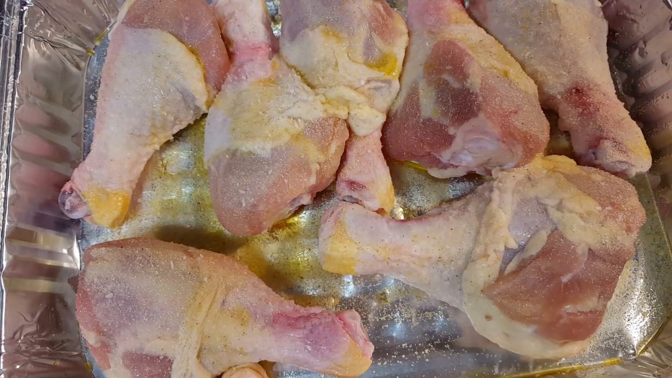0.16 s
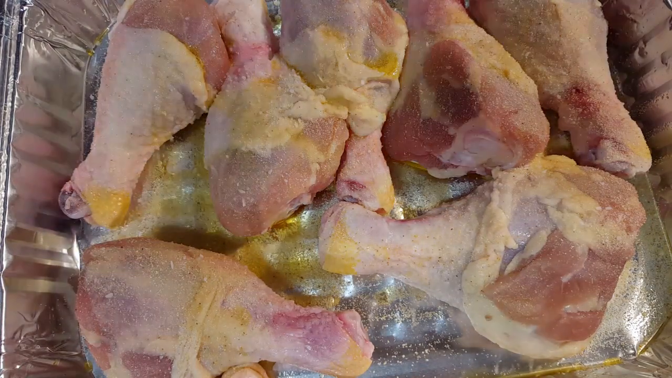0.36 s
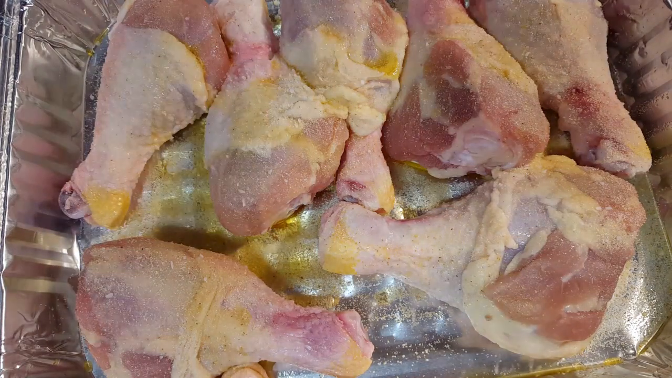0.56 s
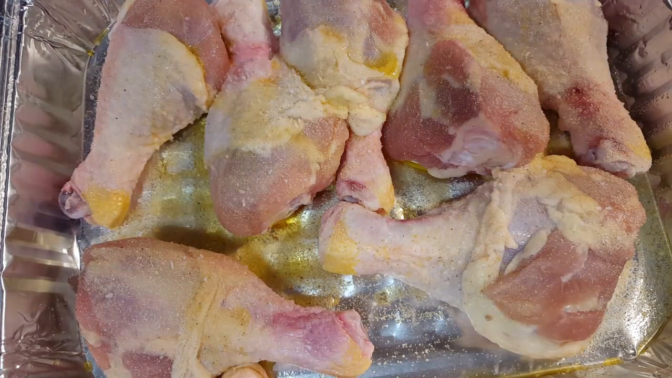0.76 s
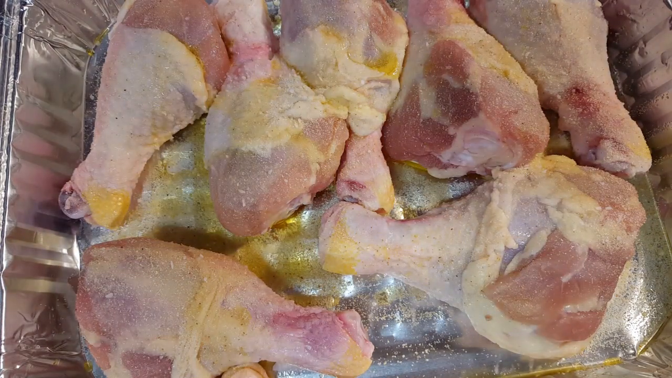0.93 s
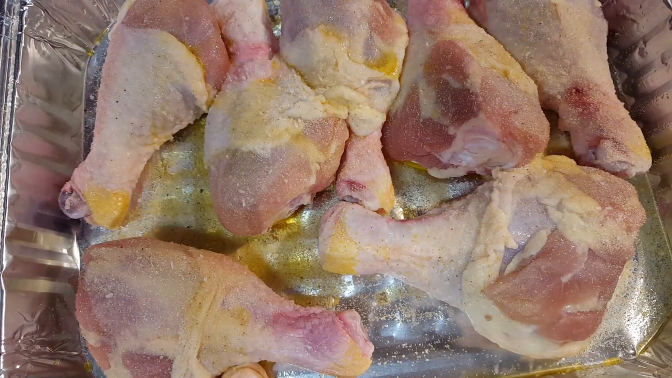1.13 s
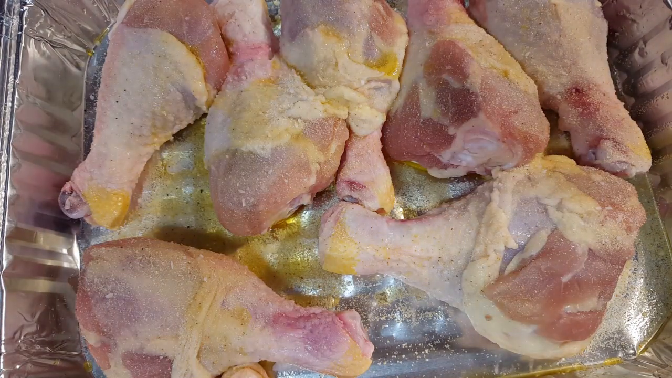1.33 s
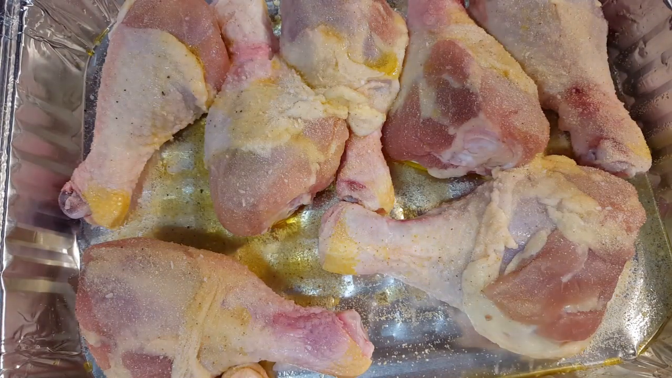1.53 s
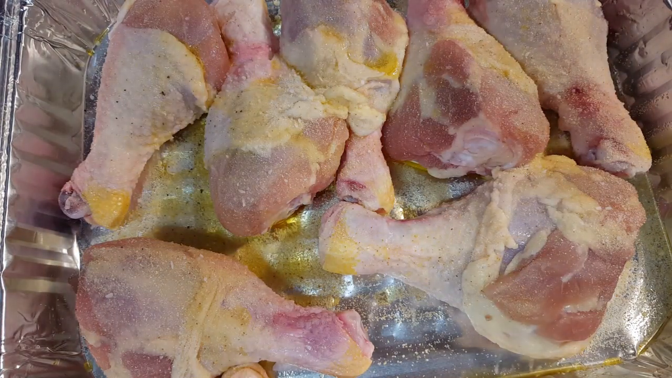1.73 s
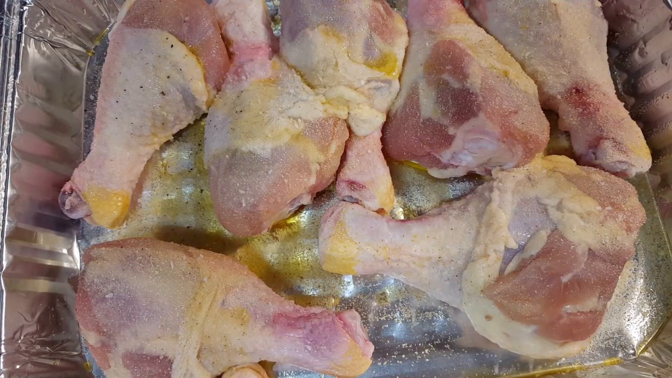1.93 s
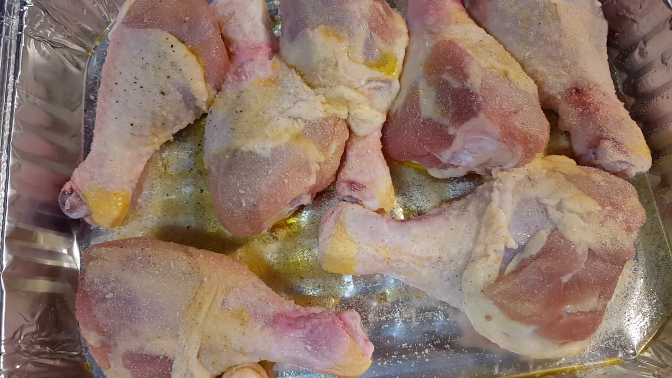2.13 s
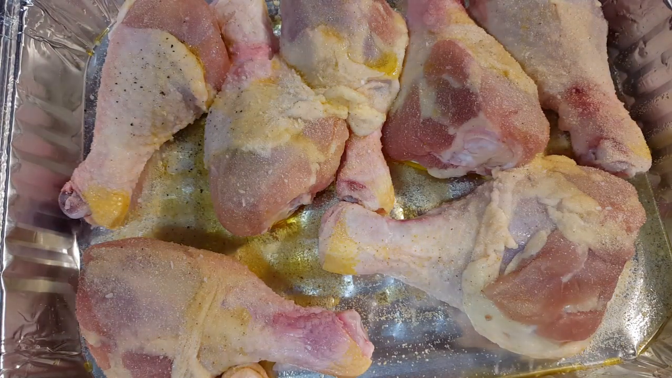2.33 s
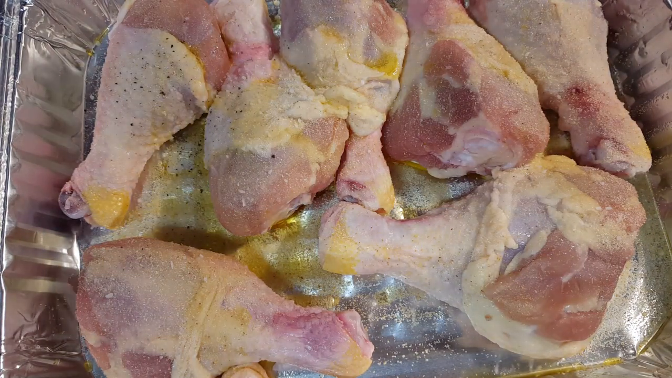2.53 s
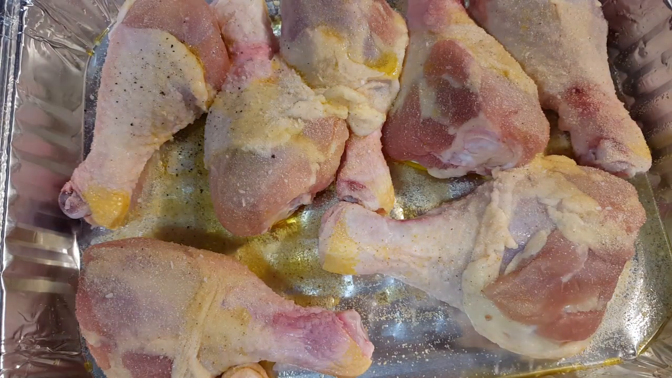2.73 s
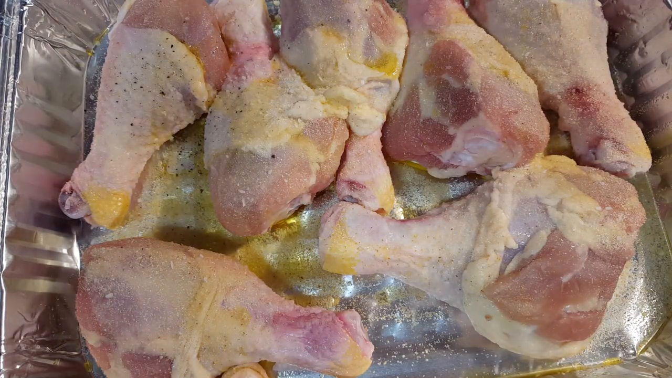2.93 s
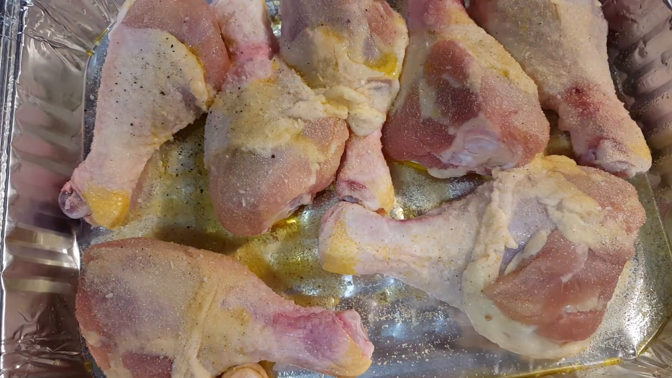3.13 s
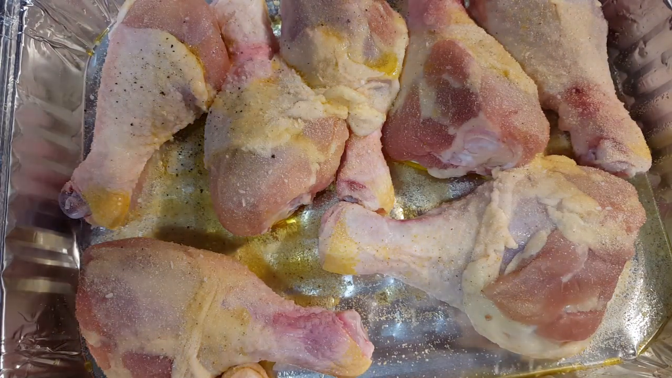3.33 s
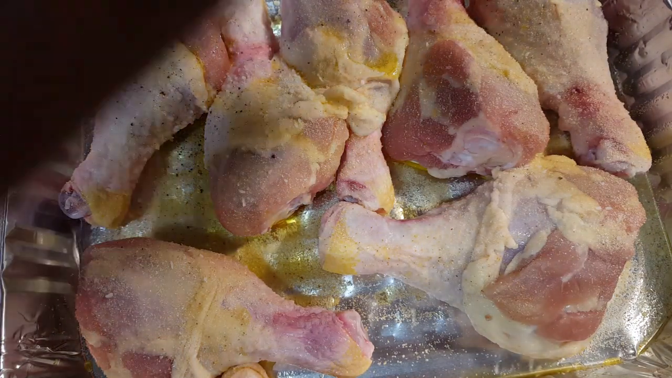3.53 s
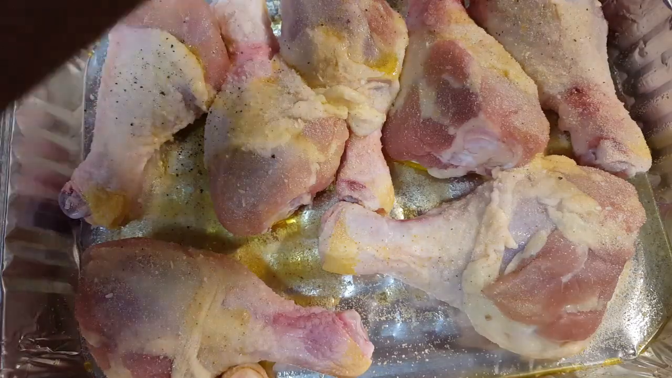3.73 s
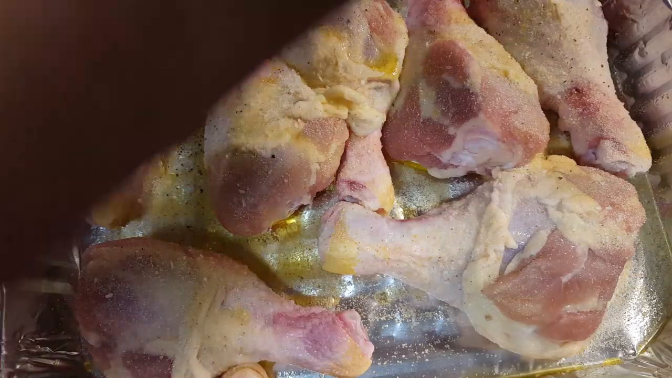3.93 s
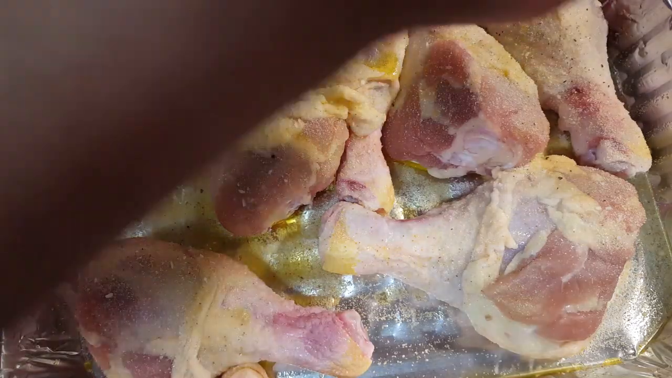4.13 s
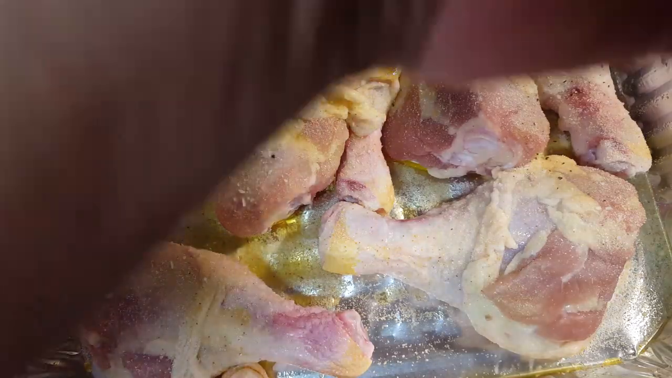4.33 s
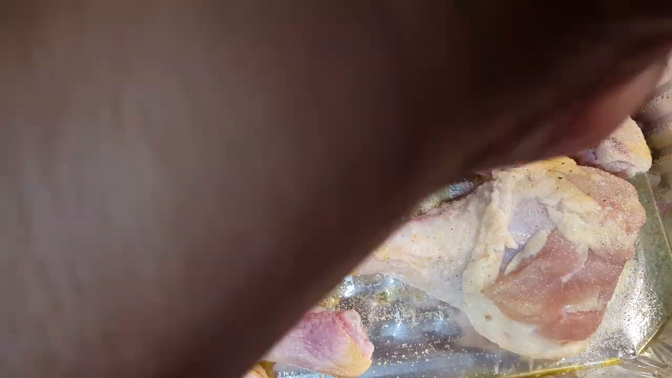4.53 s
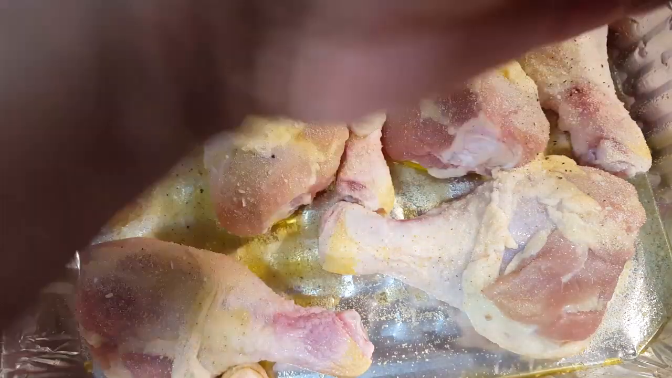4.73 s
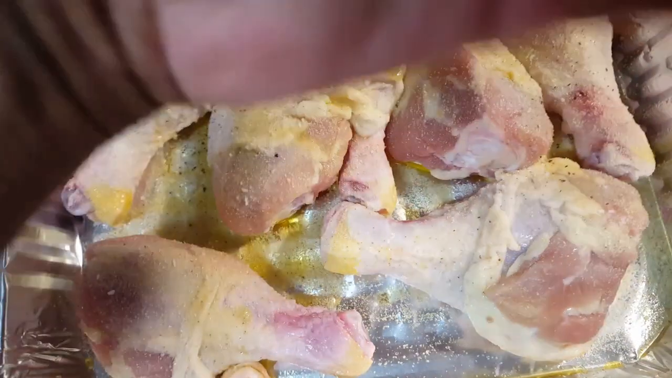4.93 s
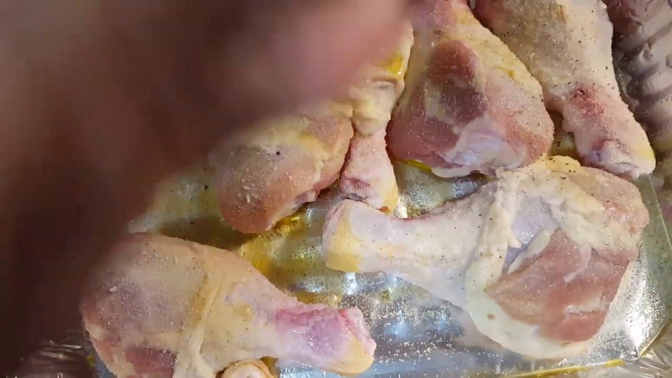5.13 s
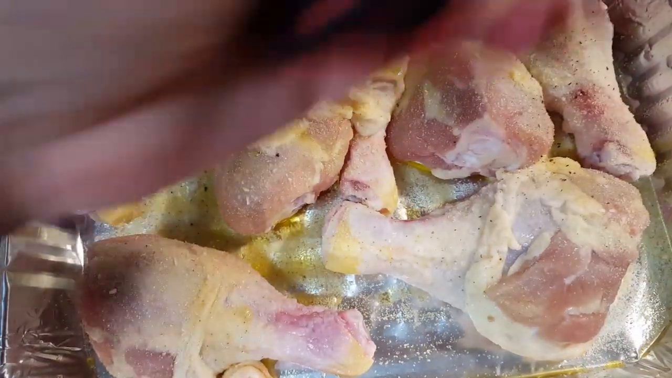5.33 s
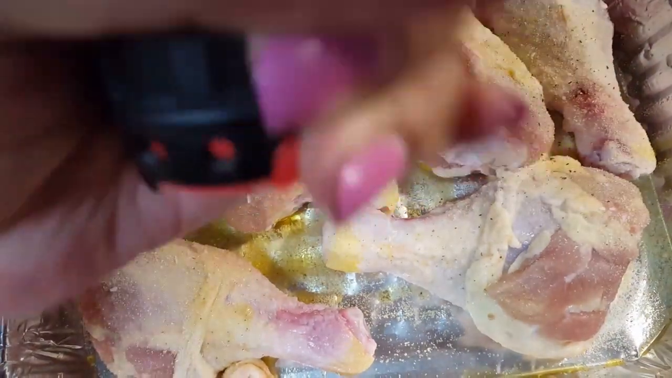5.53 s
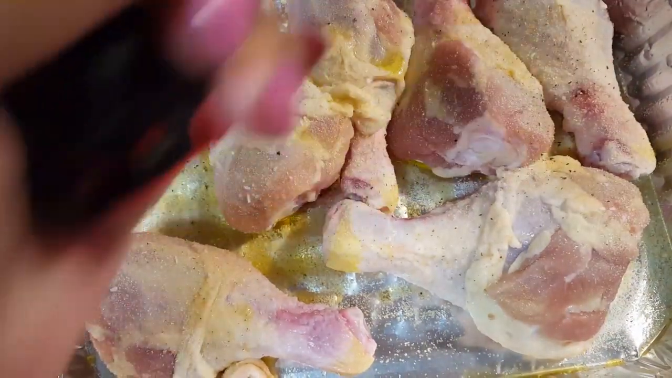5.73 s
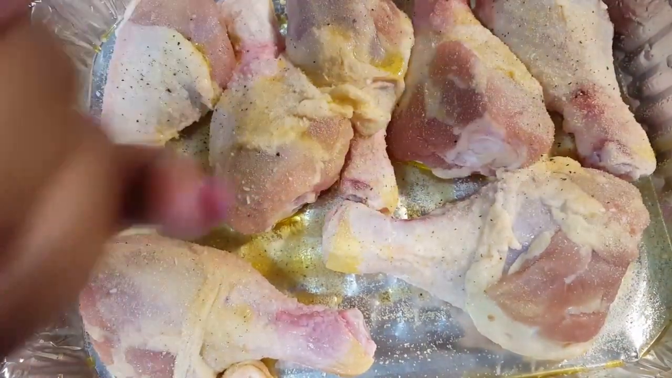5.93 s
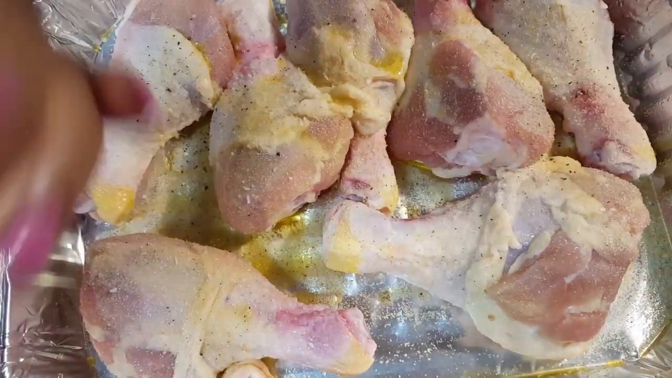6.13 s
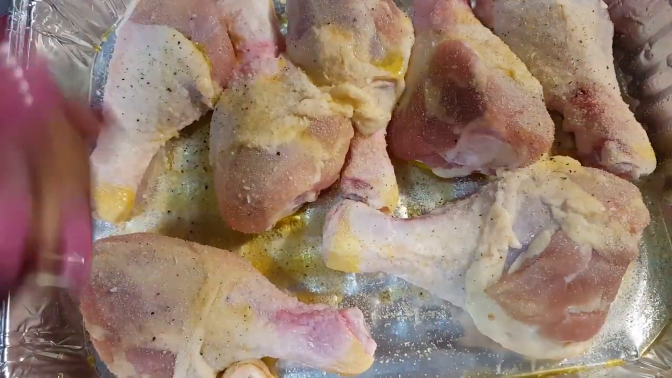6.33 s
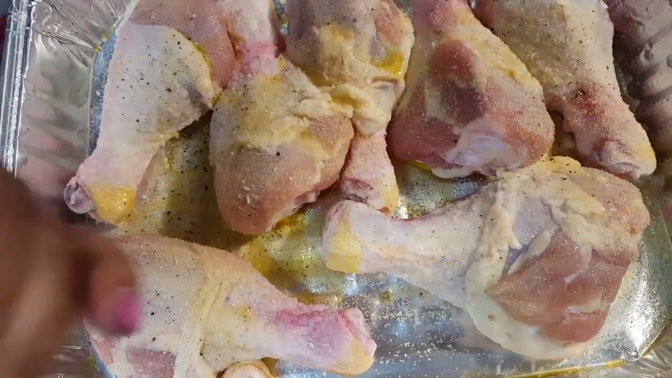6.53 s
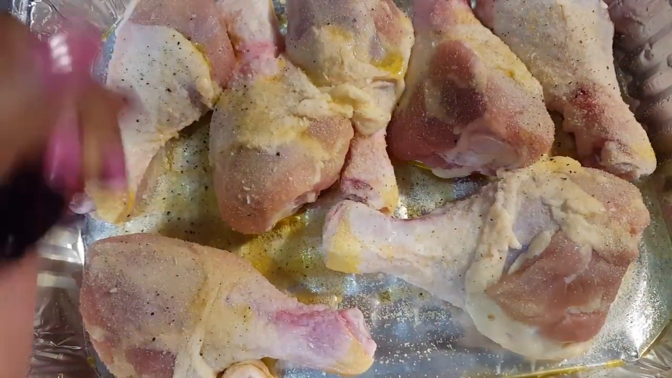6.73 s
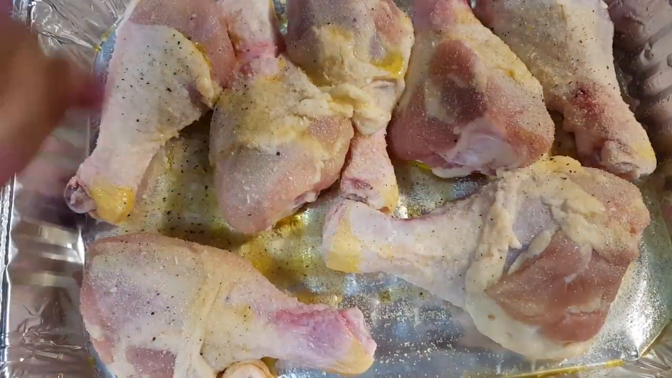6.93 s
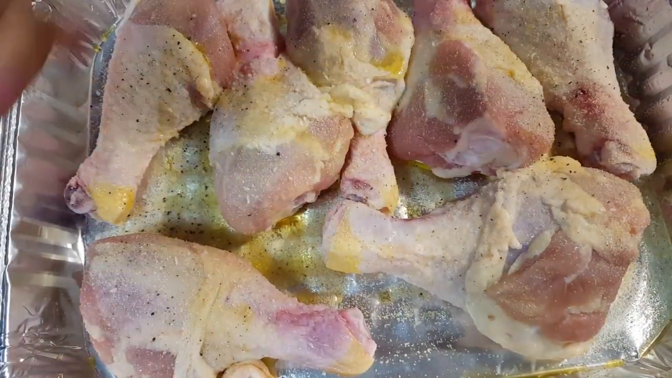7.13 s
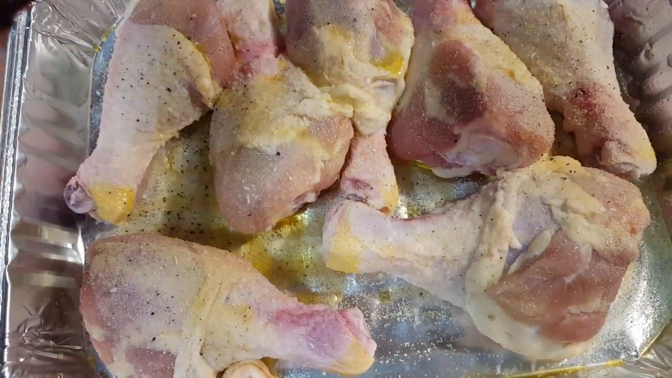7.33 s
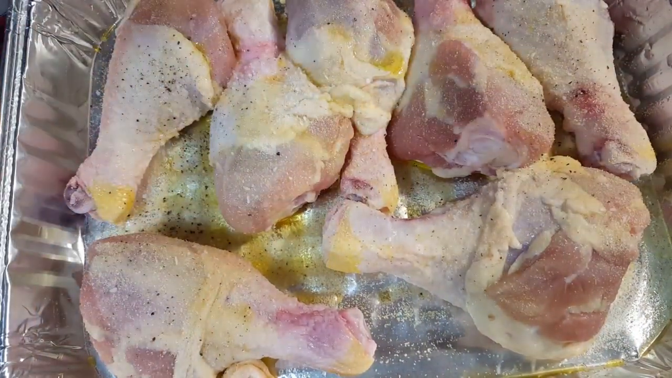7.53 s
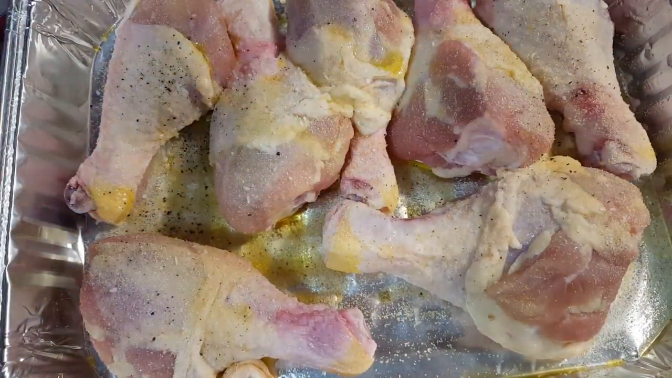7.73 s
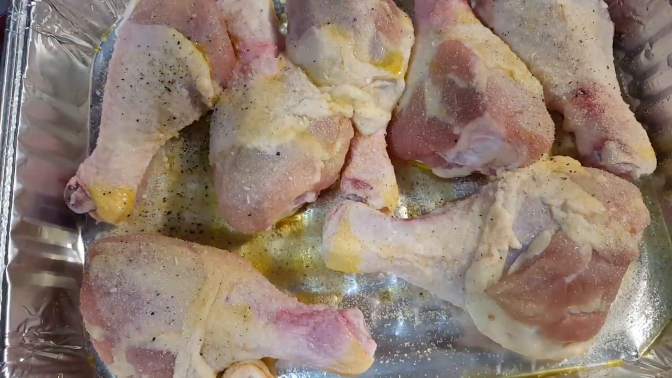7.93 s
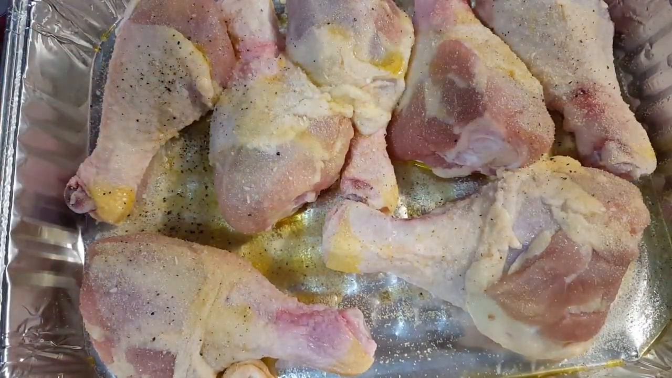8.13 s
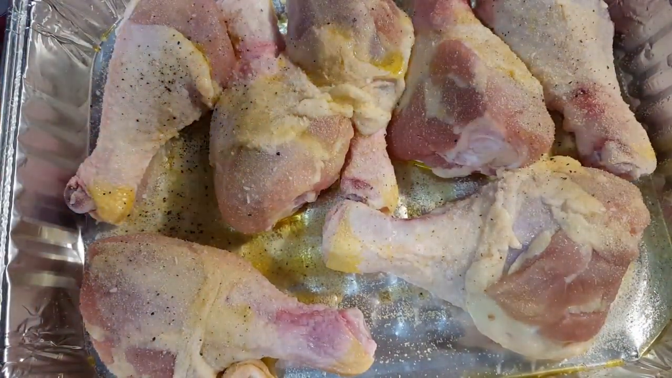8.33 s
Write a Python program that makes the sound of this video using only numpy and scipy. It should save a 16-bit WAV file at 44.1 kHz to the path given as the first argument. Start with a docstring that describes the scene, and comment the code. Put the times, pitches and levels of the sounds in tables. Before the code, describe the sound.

Peppercorns crack and crunch in a hand mill, about two twists a second, with light knocks in a small, humming kitchen.

```python
"""A refrigerator hums in a small kitchen. A hand-held pepper mill, close to a two-microphone camera,
moves from left to right and back. With each short twist corns crack in the burr over a dense crunch, and
loose corns rustle in the jar. Jolts knock the housing and puff air on the nearer microphone port; the
walls answer briefly. The background ducks after the first loud cracks and slowly returns, as under
automatic gain. Midway a low tone comes twice and something hollow is bumped."""
import sys
import numpy as np
from scipy import signal
from scipy.fft import rfft, irfft, next_fast_len
from scipy.io import wavfile
from scipy.ndimage import uniform_filter1d, map_coordinates

SR = 44100
rng = np.random.default_rng(int(sys.argv[2]) if len(sys.argv) > 2 else 0)


def bounce(signal):
    """Save signal as a 16-bit WAV file at the path given by the first command-line argument."""
    frames = np.transpose(np.atleast_2d(signal))
    limited = np.clip(frames, -1, 1)
    pcm = np.round(limited * 32767).astype(np.int16)
    wavfile.write(sys.argv[1], SR, pcm)


N = 373968

# Levels in the tables are relative; each source adds its own gain.
# A set curve that ducks the background and slowly returns, as under automatic gain: t/s, level/dB
BACKGROUND_GAIN = [(0, -53), (1.15, -54.5), (1.3, -61.5), (1.62, -61), (1.8, -67.5), (2.45, -65.5),
                   (2.8, -58.5), (3.25, -53.5), (8.48, -55.5)]
# Spectrum of the room air: f/Hz, level/dB
AIR_SPECTRUM = [(15, -38.5), (25, -11), (130, -2.5), (209, -6.5), (259, -10.5), (477, -9), (575, -17.5),
                (730, -11.5), (1030, -18.5), (1150, -19.5), (1380, -23), (2350, -25), (6000, -30.5),
                (14300, -32)]
# How alike that air is at the two microphones: f/Hz, likeness (clipped to -1..1)
AIR_LIKENESS = [(60, 0.99), (240, 0.99), (950, -0.13), (3770, 0.057), (15000, -2)]
# Lines of the refrigerator motor: f/Hz, level/dB
MOTOR_LINES = [(59.2, -66), (209.9, -60.5), (296.1, -66), (355.3, -67.5), (473.7, -66.5), (699.8, -78),
               (1125, -75.5), (1184, -76.5)]
# A fuzzy band in the hum: f/Hz, width/Hz, level/dB
DRONE_BAND = [(217, 49, 0)]
# Where the mill is held before the microphones: t/s, left over right/dB
MILL_PAN = [(0, 1.5), (.5, 7), (1.2, 4.5), (1.7, 6), (2.2, 6), (2.7, 4.5), (3.1, 1), (3.6, -1.5), (4.1, -1),
            (4.6, -2.5), (5.1, 2.5), (5.7, 4.5), (6.2, 8.5), (6.8, 6.5), (7.3, 7), (7.8, 7), (8.48, 2)]
# The hand jolts the mill: t/s, air puff/dB, housing knock/dB
JOLTS = [(0.1075, -53, -30.5), (1.158, -38, -27), (1.211, -33.5, -27), (1.617, -8.5, -12.5),
         (1.672, -25.5, -26), (1.721, -27, -22), (2.122, -9.5, -26), (2.16, -25, -27), (2.226, -44, -29),
         (2.732, -40, -28.5), (3.579, -34, -21), (3.627, -37, -21.5), (4.483, -35, -38), (4.5, -25.5, -34),
         (4.586, -27, -26), (4.853, -28, -15.5), (5.128, -32, -24), (5.627, -27.5, -31),
         (5.734, -42, -27.5), (6.163, -25, -39), (6.254, -32.5, -43), (6.27, -22, -25.5),
         (6.316, -30.5, -33), (6.675, -24, -39), (6.704, -24, -28), (6.742, -20.5, -52),
         (6.804, -38, -23.5), (7.191, -25, -39), (7.719, -25, -25), (7.794, -28.5, -23), (8.302, -32, -28)]
# Dull resonance of the housing: f/Hz, width/Hz, level/dB
HOUSING_MODES = [(513, 1000, 0)]
# Corns breaking in the burr: t/s, ring/dB, ring f/Hz, splinters/dB
CORN_CRACKS = [(0.1087, -13.5, 2520, -55), (0.4572, -29, 2670, -25), (0.4618, -26, 4370, -25.5),
               (0.518, -25, 2990, -28), (0.5522, -26.5, 4150, -24.5), (0.726, -32, 2140, -23),
               (0.8921, -55.5, 1350, -50.5), (1.0871, -15, 1815, -12), (1.113, -9.5, 2300, -24),
               (1.1219, -7, 4470, -11), (1.132, -33, 3260, -29.5), (1.1577, -5, 2750, -8),
               (1.1687, -20.5, 2850, -14.5), (1.1743, -13.5, 4000, -25), (1.1884, -15, 2750, -35),
               (1.1941, -13, 2660, -7), (1.2078, -20.5, 2120, -13), (1.2156, -13, 4030, -27),
               (1.2527, -10, 2156, -10), (1.2597, -10, 2064, -12.5), (1.6177, -11, 3120, -10.5),
               (1.6264, -9, 3280, -17), (1.6347, -15, 3480, -13), (1.639, -9, 2390, -10),
               (1.6684, -34.5, 3360, -6), (1.6718, -19.5, 2820, -15.5), (1.6832, -28, 2200, -20),
               (1.721, -12.5, 3030, -9), (1.7733, -11.5, 3025, -12.5), (2.1217, -11, 4480, -9.5),
               (2.1277, -19.5, 3320, -15.5), (2.159, -22.5, 4200, -14.5), (2.1724, -15.5, 1410, -16),
               (2.1922, -32, 3700, -13), (2.2266, -22, 3560, -22), (2.605, -38, 2490, -11.5),
               (2.6097, -12.5, 1760, -25.5), (2.6846, -28, 2530, -21.5), (2.6969, -17, 1960, -22),
               (2.73, -12, 2910, -10), (2.8737, -39, 2140, -40.5), (2.976, -39, 2320, -45),
               (3.0523, -11.5, 2490, -21.5), (3.0631, -9, 2190, -14.5), (3.0836, -14, 2480, -23),
               (3.1055, -12, 3460, -11), (3.1257, -13, 3560, -34), (3.2314, -31.5, 5130, -23),
               (3.2897, -32, 5000, -25.5), (3.499, -11, 2580, -17), (3.5131, -9.5, 2870, -16),
               (3.5306, -10.5, 2410, -8.5), (3.555, -17.5, 2840, -11), (3.5815, -11.5, 2650, -9),
               (3.5995, -11, 4700, -12.5), (3.626, -13, 3340, -17), (3.759, -45.5, 3100, -37),
               (3.793, -42, 4500, -31), (3.8865, -40.5, 1860, -26.5), (3.9826, -9.5, 2990, -15.5),
               (4.0384, -11, 2120, -25), (4.042, -17, 2110, -15.5), (4.0817, -6, 2144, -14.5),
               (4.4434, -41, 2410, -62), (4.4592, -30, 2470, -56), (4.473, -27.5, 3800, -36),
               (4.4941, -9, 2600, -15.5), (4.5451, -13.5, 3060, -13), (4.5597, -9.5, 3200, -14),
               (4.5792, -11.5, 2560, -6.5), (4.587, -12, 2990, -10.5), (4.5957, -13.5, 2840, -40.5),
               (4.649, -24.5, 4520, -24), (4.7776, -31, 1940, -28.5), (4.8529, -18.5, 3120, -30),
               (4.9903, -37, 1830, -58), (5.01, -34, 2330, -45), (5.0375, -26, 4350, -34),
               (5.041, -2.5, 3010, -17.5), (5.071, -41, 4500, -36), (5.1169, -14.5, 2280, -32),
               (5.1297, -8, 1890, -11.5), (5.1579, -6.5, 1620, -13.5), (5.1676, -9, 1630, -13),
               (5.1785, -19, 2500, -18), (5.1844, -24, 2620, -20), (5.1953, -15.5, 2360, -30),
               (5.2206, -18, 3020, -18.5), (5.4035, -49.5, 3520, -48), (5.6195, -28, 1570, -48),
               (5.6361, -28, 1860, -36), (5.6532, -19.5, 3860, -23), (5.6589, -9, 4260, -12.5),
               (5.671, -19, 2170, -12), (5.7, -8, 4490, -10.5), (5.7084, -8.5, 2395, -16),
               (5.7135, -47, 1660, -9), (5.734, -10.5, 4370, -8.5), (5.7507, -14.5, 4400, -13),
               (6.175, -30, 2870, -28), (6.198, -23, 2900, -19), (6.2025, -9, 2170, -11),
               (6.2132, -13.5, 3160, -8.5), (6.2265, -15, 2150, -21), (6.2426, -15, 3020, -12),
               (6.2497, -14.5, 2440, -13.5), (6.2705, -12, 2380, -11), (6.3121, -19, 4270, -30),
               (6.6731, -36, 2000, -48), (6.381, -47, 2370, -40.5), (6.7006, -12.5, 2264, -14.5),
               (6.7319, -17.5, 2530, -20), (6.7373, -8.5, 2730, -34), (6.7466, -12.5, 2790, -13.5),
               (6.7608, -15.5, 3810, -15), (6.7922, -20, 2440, -22), (6.7966, -13, 3600, -9.5),
               (6.8058, -16, 1680, -12.5), (7.1908, -16.5, 2800, -6), (7.2097, -10, 3290, -23),
               (7.2232, -5, 2610, -9.5), (7.2467, -13, 3270, -23), (7.2542, -16, 2260, -12),
               (7.2653, -20, 2880, -23), (7.2965, -17, 2100, -22), (7.3085, -25, 1790, -14),
               (7.5114, -48, 2630, -48), (7.6983, -11, 3160, -14.5), (7.7052, -14, 2850, -35),
               (7.7196, -19, 2440, -24), (7.7254, -12.5, 1780, -20), (7.7351, -16, 2435, -16),
               (7.7459, -17, 2430, -21), (7.7634, -17, 2360, -14.5), (7.7689, -15, 1590, -15.5),
               (7.7899, -29, 3400, -15.5), (7.7943, -22, 1900, -24), (7.8059, -5.5, 2250, -20),
               (7.9304, -40, 2280, -34.5), (8.2838, -8.5, 2260, -19), (8.2922, -17, 2647, -12),
               (8.3039, -7, 2390, -13.5), (8.3098, -13.5, 2360, -22), (8.3162, -13, 1940, -21),
               (8.323, -10, 3040, -11), (8.342, -15, 2500, -14), (8.3863, -9.5, 2640, -22),
               (8.4066, -22.5, 2880, -31), (8.4231, -8, 3090, -8)]
# Spectrum of the mill's body: f/Hz, level/dB
BODY_SPECTRUM = [(590, -38), (1000, -15), (1360, -6.5), (1570, -2), (1930, -1), (2420, 1.5), (3600, -2),
                 (4830, -10.5), (6000, -20.5), (7800, -66), (13200, -120)]
# Spectrum of the splinters: f/Hz, level/dB
GRIT_SPECTRUM = [(2350, -36.5), (4000, -9.5), (5570, -7.5), (6060, -6), (12500, -4.5), (14400, -13),
                 (14800, -9.5), (16500, -56)]
# Decay of the kitchen: f/Hz, t60/s
WALL_DECAY = [(500, 0.19), (1300, 0.36), (3500, 0.27), (9000, 0.25)]
# What the walls give back: f/Hz, level/dB
WALL_SPECTRUM = [(500, -8), (1500, -4), (3000, -3.5), (6000, -3), (14000, -5.5)]
# The jar is tipped and corns slide: t/s, level/dB
TIPPING_LEVEL = [(.25, -75), (.32, -55.5), (.5, -45), (.65, -49), (.78, -55.5), (.86, -71)]
# High resonances of the jar: f/Hz, width/Hz, level/dB
JAR_MODES = [(3900, 900, -7), (7900, 700, -6), (9900, 500, 3), (12000, 900, -3)]
# Twists of the mill: t/s, length/s, crunch/dB, hardest push/share of length, rustle afterwards/dB
TWISTS = [(0.444, 0.35, -39.5, 0.067, -60.5), (1.07, 0.22, -33, 0.57, -74), (1.621, 0.14, -28.5, 0.13, -77),
          (2.112, 0.1, -27, 0.75, -77.5), (2.594, 0.11, -27.5, 0.42, -63.5),
          (3.052, 0.11, -19.5, 0.52, -74), (3.506, 0.06, -22.5, 0.35, -63), (3.979, .13, -28.5, 0.84, -67),
          (4.49, 0.086, -25, 0.58, -67), (5.04, .2, -25.5, 0.8, -64), (5.627, .15, -21.5, 0.63, -64.5),
          (6.16, 0.14, -26, 0.23, -74), (6.69, 0.16, -25, 0.62, -66.5), (7.186, 0.13, -22, 0.56, -66),
          (7.706, .13, -18, 0.61, -68), (8.276, 0.16, -20.5, 0.29, -65)]
# A low tone in the room: t/s, length/s, f/Hz, level/dB
LOW_TONES = [(4.58, .46, 141.6, -50.5), (5.328, .33, 150, -46.5)]
# Resonances of the bumped hollow body: f/Hz, width/Hz, level/dB
HOLLOW_MODES = [(125, 41, 0), (202, 88, 3), (290, 120, 2), (620, 530, -7.5), (970, 380, -6.5)]
# Deep bass thins and the top treble is cut off: f/Hz, level/dB
BAND_LIMITS = [(20, -10.5), (60, 0), (14300, -0.5), (14900, -10), (16500, -43)]


def amp(db):
    return 10 ** (np.asarray(db) / 20)


def unit(x):
    return x / np.sqrt(np.mean(x ** 2) + 1e-20)


def along(points, hz):
    """Reads (f/Hz, value) points on a log axis."""
    f, v = np.transpose(points)
    return np.interp(np.log(hz + 1), np.log(f + 1), v)


def curve(points):
    """One value per sample from (t/s, value) points."""
    return np.interp(np.arange(N) / SR, *np.transpose(points))


def wobble(rate):
    """A smooth random curve, rate knots a second."""
    return map_coordinates(rng.standard_normal(int(N * rate / SR) + 4), [np.arange(N) * rate / SR])


def filtered(x, response):
    """x through a complex response of frequency."""
    m = next_fast_len(N + SR // 2)
    return irfft(rfft(x, m) * response(np.fft.rfftfreq(m, 1 / SR)), m)[..., :N]


def coloured(x, response):
    """Filters with a gain that keeps white noise at its level."""
    power = np.mean(abs(response(np.linspace(0, SR / 2, 2048))) ** 2)
    return filtered(x, response) / np.sqrt(power)


def spectrum(points):
    return lambda hz: amp(along(points, hz))


def modes(rows):
    """Response of causal resonances, alternating in sign."""
    return lambda f: sum((-1) ** k * amp(db) * 1j * f * width / (hz * hz - f * f + 1j * f * width)
                         for k, (hz, width, db) in enumerate(rows))


def pan_at(times):
    return np.interp(times, *np.transpose(MILL_PAN))


def placed(times, shapes, pan_db):
    """Sums one shape per event and microphone; the far one hears it later and weaker."""
    lag_s = .00017 * np.tanh(pan_at(times) / 3.8)
    out = []
    for side, shape in zip((1, -1), shapes):
        at = np.round((times - side * lag_s) * SR).astype(int)[:, None] + np.arange(shape.shape[1])
        gain = amp(np.minimum(side * pan_db, 0) + np.minimum(abs(pan_db), 6) / 2)[:, None]
        out.append(np.bincount(np.clip(at, 0, N).ravel(), (gain * shape).ravel(), N + 1)[:N])
    return np.array(out)


def bursts(count, life_s, alike, samples=900):
    """Noise bursts of equal energy; the share alike is common to both microphones."""
    t = np.arange(samples) / SR
    common, left, right = np.moveaxis(rng.standard_normal((count, 3, samples)), 1, 0)
    shape = t / life_s * np.exp(1 - t / life_s)
    pair = shape * np.array([np.sqrt(alike) * common + np.sqrt(1 - alike) * own for own in (left, right)])
    return pair * np.linalg.norm(shape) / np.linalg.norm(pair, axis=2, keepdims=True)


def grains(spread_db, life_s, alike, rubbing, count=6000):
    """Many tiny clicks on a little rubbing noise, even in level over a tenth of a second."""
    times, chance = rng.random((count, 2)).T * [[N / SR], [1]]
    size = amp(-spread_db * np.log(1 - chance))[:, None]
    clicks = unit(placed(times, size * bursts(count, life_s, alike, samples=128), pan_at(times)))
    x = clicks + rubbing * amp(np.outer([.5, -.5], curve(MILL_PAN))) * rng.standard_normal((2, N))
    return x / np.sqrt(abs(uniform_filter1d(np.mean(x ** 2, 0), size=4000)) + 1e-9)


def room_air():
    """Wavering kitchen air: the bass is alike at both microphones, the treble is not."""
    def mid_side(hz):
        angle = np.arccos(np.clip(along(AIR_LIKENESS, hz), -1, 1)) / 2
        return amp(along(AIR_SPECTRUM, hz)) * [np.cos(angle), np.sin(angle)]
    mid, side = filtered(rng.standard_normal((2, N)), mid_side)
    return amp(-1 + 2.37 * wobble(6)) * unit(np.array([mid + side, mid - side]))


def refrigerator():
    """Motor lines, each at its own phase at each microphone, over a fuzzy drone."""
    t = np.arange(N) / SR
    phases = rng.normal(0, 0.71, (len(MOTOR_LINES), 2, 1))
    hum = sum(amp(db + 58 + 0.7 * wobble(3.1)) * np.sin(2 * np.pi * hz * t + phase)
              for (hz, db), phase in zip(MOTOR_LINES, phases))
    drone = amp(-6) * unit(filtered(rng.standard_normal(N), modes(DRONE_BAND)))
    return hum + drone


def thumps():
    """A jolt knocks the housing and puffs on the port: a push and swing back if hard, a wobble if weak."""
    times, puff_db, knock_db = np.transpose(JOLTS)
    pan_db = pan_at(times)
    t = np.arange(1500) / SR
    age = t / 0.0016
    push = (1 - age) * np.exp(-age) * (1 - np.exp(-age / .2)) ** 2
    pitch, *phases = rng.random((len(times), 3, 1)).transpose(1, 0, 2)
    envelope = 0.17 * t / 0.0058 * np.exp(1 - t / 0.0041)
    wobbles = [envelope * np.sin(2 * np.pi * ((90 + 90 * pitch) * t + phase)) for phase in phases]
    hard = np.interp(puff_db, [-30, -12], [.1, 1])
    puffs = [amp(puff_db + 11.5)[:, None] * (hard[:, None] * push + (1 - hard[:, None]) * weak)
             for weak in wobbles]
    # a puff favours the nearer port more than sound does, a hard puff most
    puff_pan_db = 4.3 * pan_db + 18 * hard * np.sign(pan_db)
    knocks = amp(knock_db)[:, None] * bursts(len(times), life_s=0.00065, alike=0.39)
    housing = coloured(placed(times, knocks, pan_db), modes(HOUSING_MODES))
    return housing + placed(times, puffs, puff_pan_db)


def cracks(loudest_db=-2.5, scatter_db=11.5, splinter_share=0.45):
    """A corn breaks: the mill rings briefly, its housing knocks, splinters hiss, the pieces crumble on."""
    times, db, hz, splinter_db = np.vstack([CORN_CRACKS, small_cracks_and_ticks(per_twist=5)]).T
    count = len(times)
    db = np.minimum(db, loudest_db)
    start_phase, shade, knock_luck, crumb_luck = rng.random((count, 4)).T
    knock_db = db - 28.5 + scatter_db * (knock_luck - .5)
    break_db = splinter_share * splinter_db + (1 - splinter_share) * db
    crumb_db = 0.74 * break_db - 12.5 + scatter_db * (crumb_luck - .5) / 2  # grows less than the crack
    bright_db = np.clip(splinter_db - db, -20, 6) / 2
    pan_db = pan_at(times) + 6 * (shade - .5)  # the hand shades each crack differently
    t = np.arange(900) / SR
    phase = 2 * np.pi * (hz[:, None] * t + start_phase[:, None])
    ring = t / 0.00057 * np.exp(1 - t / 0.00051) * np.sin(phase)
    # crumbs keep the crack's hollow note going: slow noise on its pitch
    slow = [uniform_filter1d(bursts(count, life_s=0.0018, alike=0.27), size=36, axis=2) for _ in range(2)]
    note = slow[0] * np.sin(phase) + slow[1] * np.cos(phase)
    pitched = amp(db - 4.5)[:, None] * ring + amp(crumb_db + 6 - bright_db)[:, None] * note
    sound = placed(times, pitched, pan_db)
    body, grit = spectrum(BODY_SPECTRUM), spectrum(GRIT_SPECTRUM)
    layers = [(db - 8, .0005, .4, body),
              (splinter_db - 4.5, .0004, .2, grit),
              (knock_db, .0008, .3, modes(HOUSING_MODES)),
              (crumb_db - 10 - bright_db, .0022, .4, body),
              (crumb_db - 4 + bright_db, .0018, .15, grit)]
    for level_db, life_s, alike, response in layers:
        noise = amp(level_db)[:, None] * bursts(count, life_s, alike)
        sound += coloured(placed(times, noise, pan_db), response)
    return sound


def walls(x, block=2048, delay=150):
    """A short, diffuse room tail, with fresh noise for each block; each frequency dies at its own speed."""
    out = np.zeros((2, N + SR))
    for at in range(0, N, block):
        hz, t, noise = signal.stft(rng.standard_normal((2, SR // 3)), SR, nperseg=256)
        decay = amp(-60 * t / along(WALL_DECAY, hz)[:, None])
        tail = signal.istft(noise * decay, SR, nperseg=256)[1]
        wet = signal.fftconvolve(x[:, at:at + block], tail / np.linalg.norm(tail[0]), axes=1)
        out[:, at + delay:at + delay + wet.shape[1]] += wet
    return filtered(out[:, :N], spectrum(WALL_SPECTRUM))


def jar_rustle(grip_s=(.78, .9), turn_back_s=.2):
    """Loose corns slide: the jar rings until gripped, then rustles faintly as the wrist turns back."""
    ticks = grains(spread_db=0, life_s=0.00014, alike=0.15, rubbing=0.4)
    free = np.interp(np.arange(N) / SR, grip_s, [1, .15])
    ringing = free * unit(filtered(ticks, modes(JAR_MODES)))
    gripped = 0.98 * (1 - free) * unit(filtered(ticks, spectrum(GRIT_SPECTRUM)))
    turns_back = [(start + length + turn_back_s, db) for start, length, *_, db in TWISTS]
    return amp(curve(TIPPING_LEVEL + turns_back)) * (ringing + gripped)


BITE_S, LET_GO_S = 0.027, 0.037  # the edges of a twist


def effort_db():
    """Crunch level: each twist bites, pushes hardest once, and lets go."""
    points = []
    for start, length, db, hardest, _ in TWISTS:
        peak, end = start + np.clip(hardest, .05, .95) * length, start + length
        points += [(start - BITE_S, db - 44), (start, db - 15), (peak, db),
                   (end, db - 11.5), (end + LET_GO_S, db - 44)]
    return curve(points)


def crunch():
    """The burr crushes fragments: the same grains shake the mill's body and spray grit."""
    coarse = grains(spread_db=2.5, life_s=0.0005, alike=0.34, rubbing=0.12)
    fine = grains(spread_db=2.5, life_s=0.000083, alike=0.2, rubbing=.2)
    body = amp(-7.5) * unit(filtered(coarse, spectrum(BODY_SPECTRUM)))
    grit = amp(-10) * unit(filtered(0.73 * coarse + fine, spectrum(GRIT_SPECTRUM)))
    return amp(effort_db() + 3 * wobble(25)) * (body + grit)


def small_cracks_and_ticks(per_twist, ring_hz=(1720, 4390), ticking_s=0.24):
    """More crack rows: lesser corns break during each twist; then loose ones tick, thin and bright."""
    start, length, _, _, rustle_db = np.repeat(TWISTS, per_twist, 0).T
    when, small, pitch, bright, later, faint = rng.random((len(start), 6)).T
    times = np.minimum(start + length * when, (N - 1) / SR)
    db = effort_db()[(times * SR).astype(int)] + 10.5 - 7 * small
    hz = np.interp(pitch, [0, 1], ring_hz)
    breaks = [times, db, hz, db + 12 * (bright - .5)]
    tick_db = rustle_db + 19 - 18 * faint
    ticks = [start + length + LET_GO_S + ticking_s * later, tick_db - 5, hz, tick_db]
    return np.hstack([breaks, ticks]).T


def low_tone(start, length, hz, db, swell_db=5.5):
    """A low, slightly wavering tone that grows while it lasts."""
    t = np.arange(N) / SR
    progress = (t - start) / length
    swell = (progress > 0) * (progress < 1) * amp(db + swell_db * np.clip(progress - 1, -1, 0))
    return uniform_filter1d(swell, size=1800) * np.sin(2 * np.pi * hz * t + .5 * wobble(9.8))


def bump(at_s, db):
    """One dull, dragging blow on a hollow body."""
    t = np.maximum(np.arange(N) / SR - at_s, 0)
    drag = (1 - np.exp(-t / 0.0012)) * (amp(-60 * t / 0.083) + 0.44 * amp(-60 * t / 0.45))
    return amp(db) * coloured(drag * rng.standard_normal(N), modes(HOLLOW_MODES))


def scene():
    """The mill close up, the kitchen behind it and a little to the left."""
    mill = cracks() + crunch() + jar_rustle()
    reflections = amp(-8) * walls(mill)
    knocks = thumps() + bump(at_s=4.886, db=-33.5)
    kitchen = amp(curve(BACKGROUND_GAIN)) * (room_air() + refrigerator())
    kitchen += sum(low_tone(*row) for row in LOW_TONES)
    return mill + reflections + knocks + amp([[1.5], [-1.5]]) * kitchen


def record(dry, top_hz=16600):
    """Peaks flatten softly at full scale; deep bass thins and the top treble is cut off."""
    soft = dry / (1 + abs(dry) ** 6) ** (1 / 6)
    return filtered(soft, lambda hz: amp(along(BAND_LIMITS, hz)) * (hz < top_hz))


dry = scene()
out = record(dry)
bounce(out)
```